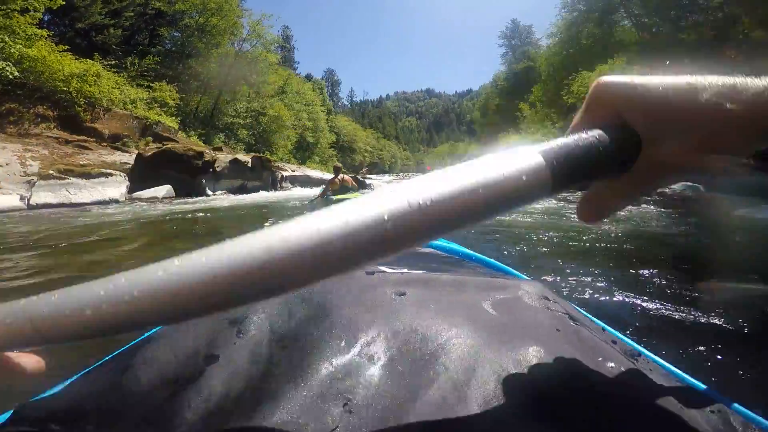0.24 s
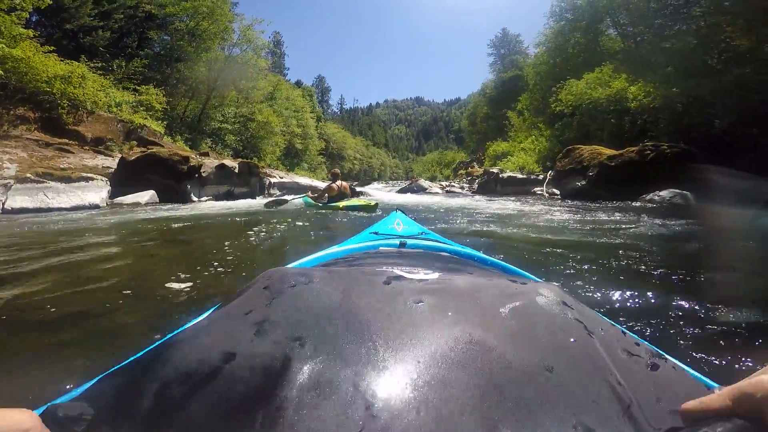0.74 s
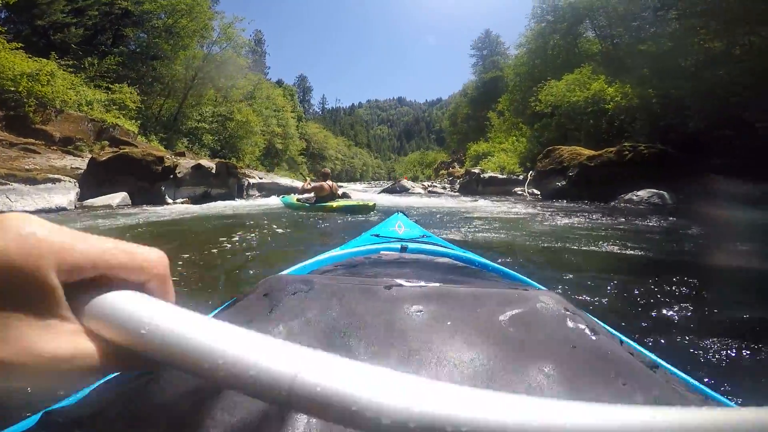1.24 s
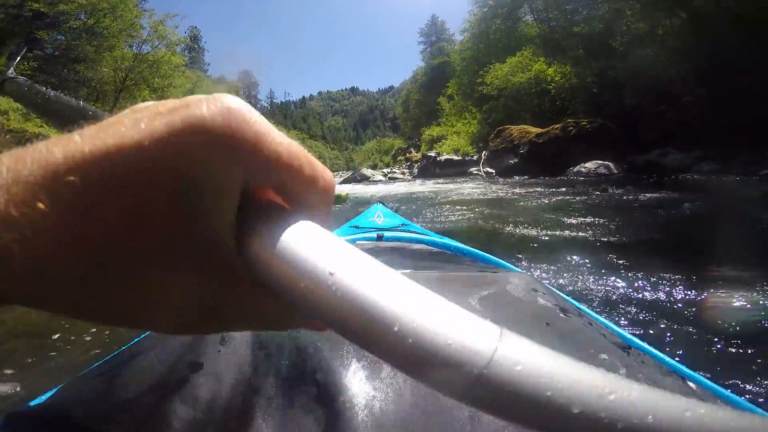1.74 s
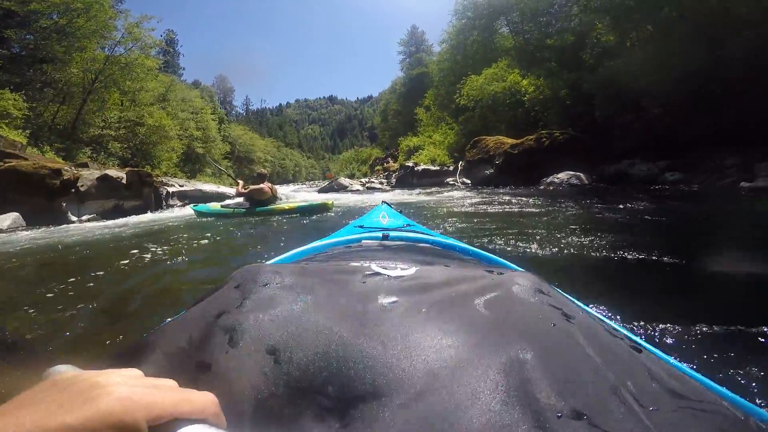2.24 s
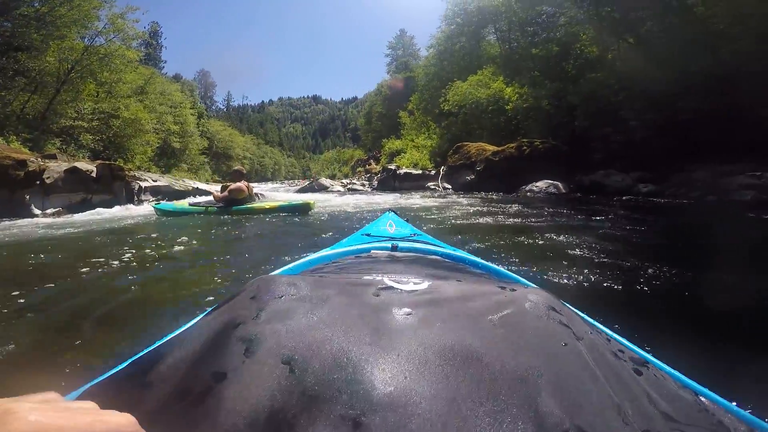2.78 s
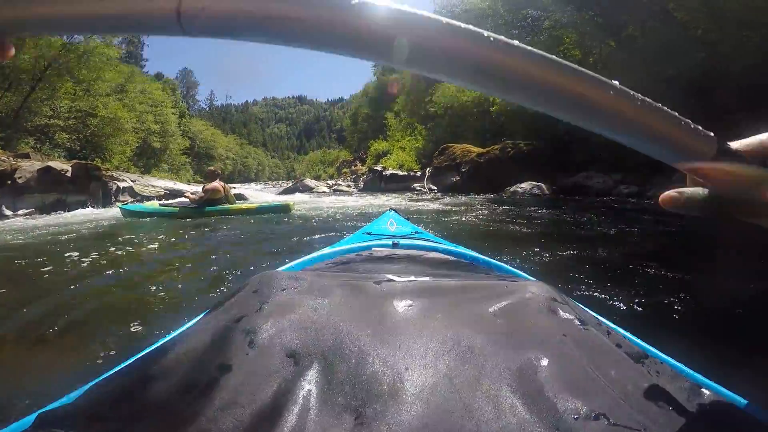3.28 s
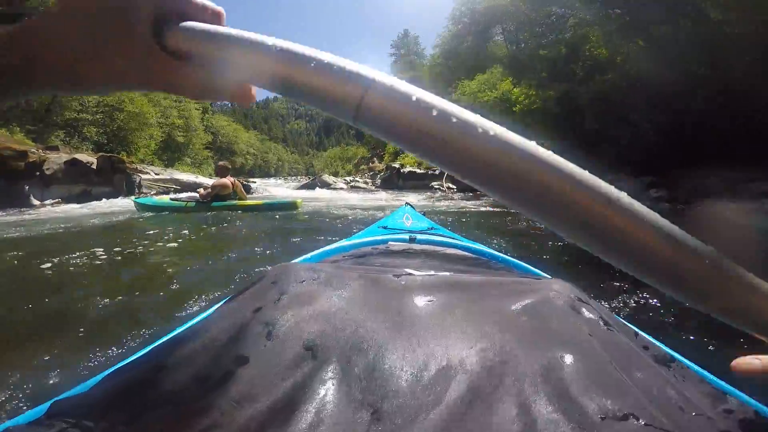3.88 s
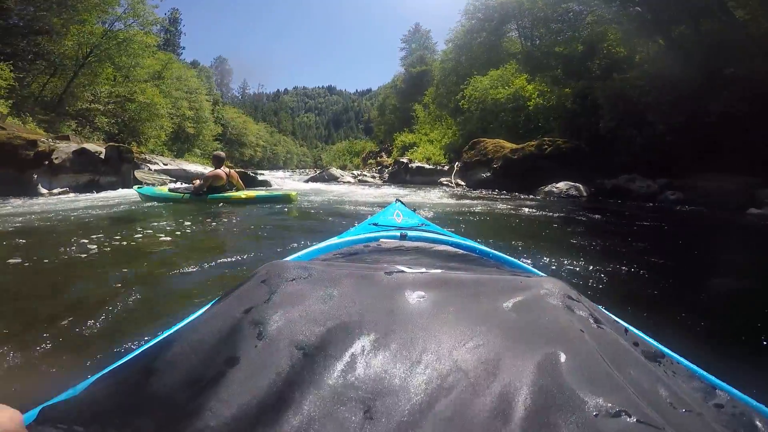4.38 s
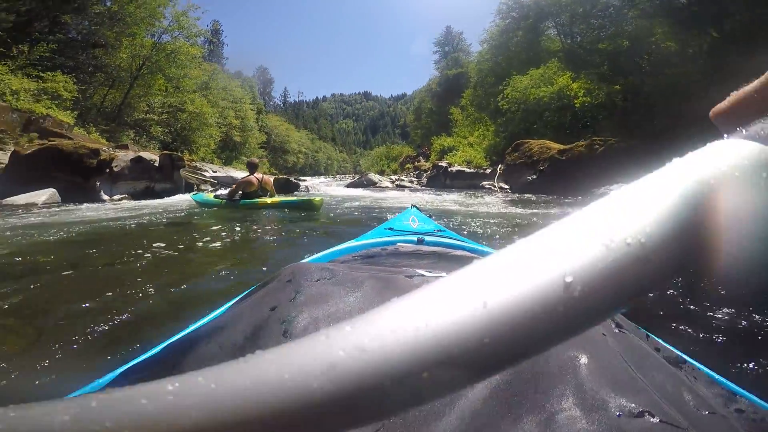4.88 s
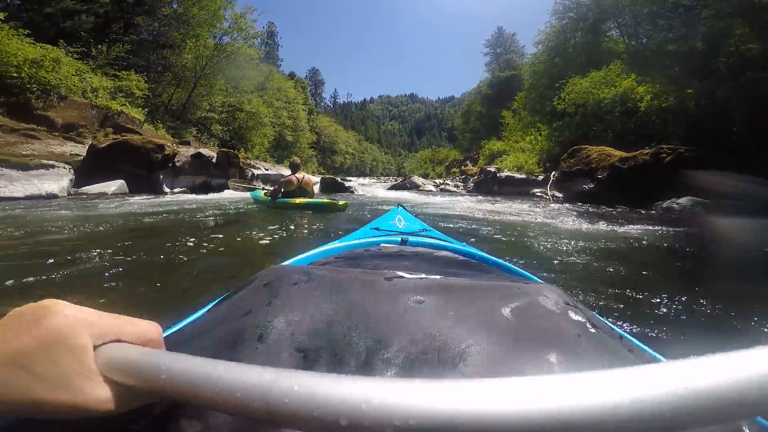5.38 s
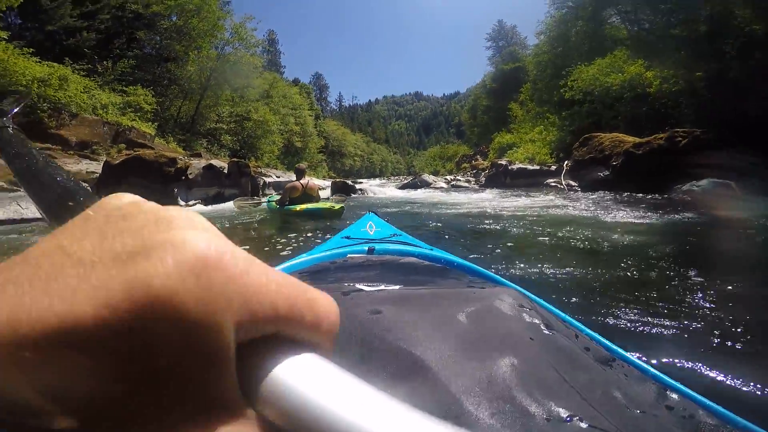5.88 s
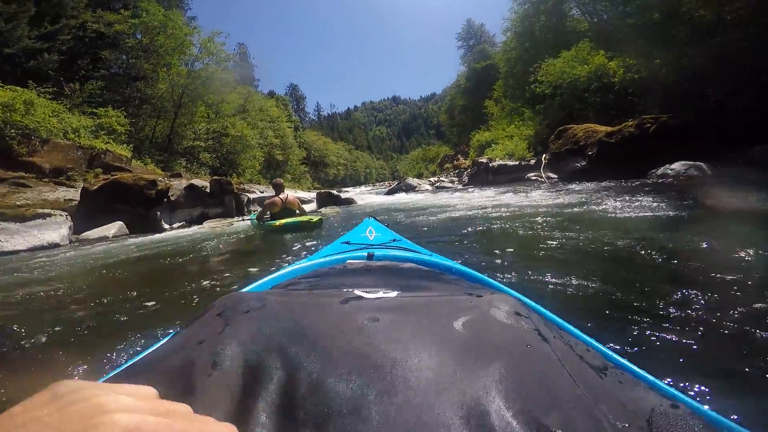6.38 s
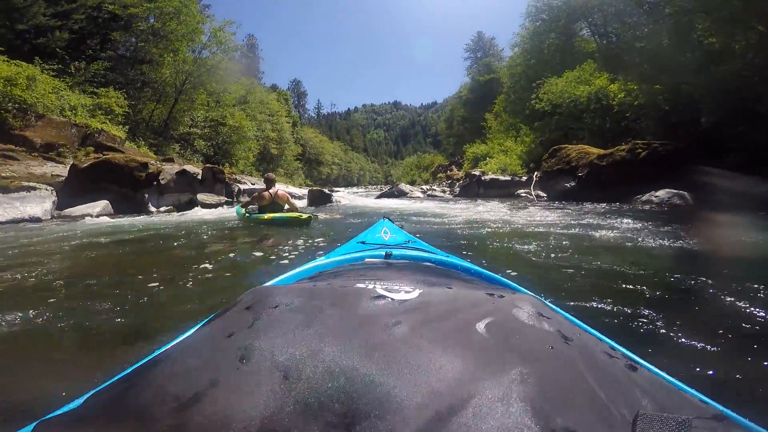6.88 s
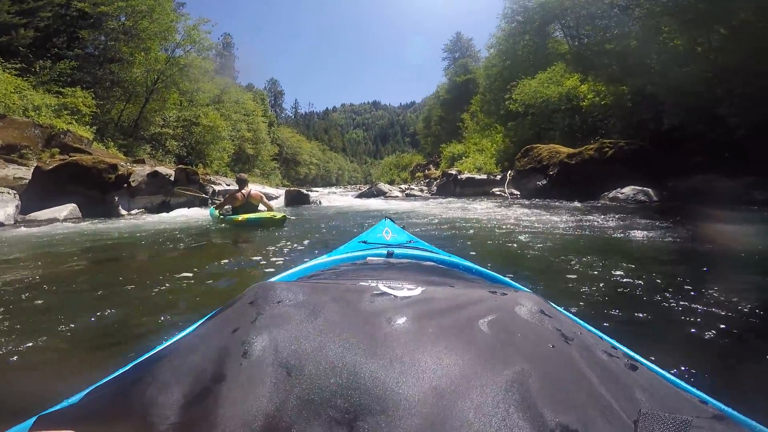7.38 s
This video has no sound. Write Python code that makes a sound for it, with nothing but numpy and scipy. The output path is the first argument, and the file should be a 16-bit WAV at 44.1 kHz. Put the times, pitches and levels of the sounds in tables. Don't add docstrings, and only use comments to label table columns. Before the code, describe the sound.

Steady muffled rush of river rapids heard from a kayak, with low wind rumble, bassy body thumps, small drips, hollow paddle plops and one hard knock.

```python
import sys
import numpy as np
from scipy import signal
from scipy.io import wavfile
from scipy.ndimage import uniform_filter1d

SR = 44100
rng = np.random.default_rng(int(sys.argv[2]) if len(sys.argv) > 2 else 0)


def rack_gain(trim_db):
    fader = np.asarray(trim_db, float)
    return 10 ** (fader / 20)


def waveform_to_disk(signal):
    frames = np.transpose(np.atleast_2d(signal))
    scaled = np.clip(frames, -1, 1) * 32767
    samples = np.round(scaled).astype(np.int16)
    wavfile.write(sys.argv[1], SR, samples)


N = 336483


def evened(x):
    return x / np.sqrt(np.mean(x ** 2) + 1e-20)


def read_spectrum(points, hz):
    f, value = np.transpose(points)
    return np.interp(np.log(hz + 1), np.log(f + 1), value)


def steady(points):
    return lambda hz, t: read_spectrum(points, hz) + 0 * t


def add(mix, s, sound):
    at = round(s * SR) - len(sound) // 2 + np.arange(len(sound))
    inside = (at >= 0) & (at < N)
    mix[at[inside]] += sound[inside]


def curves(rows, t):
    s, *columns = np.transpose(rows)
    return [np.interp(t, s, column) for column in columns]


def noise(field_db, size, patchy_db, flicker_db):
    hop = size // 4
    frames, hz = N // hop + 5, np.fft.rfftfreq(size, 1 / SR)
    real, imaginary, patches = rng.standard_normal((frames, len(hz), 3)).T
    patches = uniform_filter1d(patches, size=8, axis=0)
    patches = evened(uniform_filter1d(patches, size=8, axis=1))
    flicker = evened(uniform_filter1d(rng.standard_normal(frames), size=4))
    level = field_db(hz[:, None], np.arange(frames) * hop / SR)
    level = level + patchy_db * patches + flicker_db * flicker
    spectra = (real + 1j * imaginary) * rack_gain(level)
    return signal.istft(spectra, nperseg=size, noverlap=size - hop)[1][:N]


# (time [s], roar level [dB], wash level [dB], splash level [dB], spray level [dB])
WATER_SWELLS = [(0.0, -54, -55, -53.5, -59.5), (0.22, -56, -53, -55, -62), (0.44, -53, -53, -54, -60.5),
                (0.65, -57, -56, -55.5, -63), (0.87, -57, -59, -55, -63.1), (1.09, -57.5, -57.5, -57, -66),
                (1.31, -57.5, -60.5, -57.5, -66), (1.53, -58.6, -55.5, -58.1, -65.5),
                (1.74, -56.5, -58, -58.1, -64.6), (1.96, -56, -57, -56.5, -64.5),
                (2.18, -58, -58, -57, -64.5), (2.4, -57, -56.1, -57.5, -64.0),
                (2.62, -55.5, -57.5, -56.5, -64.5), (2.83, -54.5, -55.5, -56.5, -65),
                (3.05, -56, -55.5, -59, -64), (3.27, -56.5, -54.5, -59, -65.5),
                (3.49, -56.5, -56, -57.5, -65.5), (3.71, -58, -55.5, -57.5, -63),
                (3.92, -54.5, -56.2, -58, -64), (4.14, -55.5, -55.5, -54, -63),
                (4.36, -55, -56.5, -56, -62.3), (4.58, -59, -54.5, -55.5, -63.0),
                (4.8, -56.3, -56, -58, -64.5), (5.01, -55.7, -55.5, -55.5, -64),
                (5.23, -54, -52.5, -54.1, -61.5), (5.45, -57.5, -54, -55, -60.5),
                (5.67, -55, -57, -53.5, -62), (5.89, -54.5, -55.8, -52.5, -61.5),
                (6.1, -55, -58, -52.5, -60), (6.32, -55, -59, -55, -62), (6.54, -54.5, -57.5, -53, -60),
                (6.76, -55, -57, -55, -61.5), (6.98, -57.5, -56.5, -54.5, -61.4),
                (7.19, -56.5, -58, -55.5, -61.5), (7.41, -55, -56.5, -54.5, -63),
                (7.63, -55.5, -55.6, -55, -61)]
SWELL_HZ = [900, 1400, 2400, 4500]
# (frequency [Hz], level per Hz [dB])
ROAR_SPECTRUM = [(150, -12), (300, -0.5), (640, 0.5), (1000, -0.5), (1500, 1.5), (2300, -2), (2900, -5),
                 (3500, -12), (4600, -15), (5600, -22.5), (6700, -23.5), (8500, -30), (10500, -39),
                 (13000, -45)]
# (frequency [Hz], width [Hz], level [dB])
CASE_DIPS = [(575, 36, -13), (1162, 70, -17), (1753, 144, -7), (1970, 160, -7), (2510, 44, -8),
             (3220, 110, -11), (4000, 150, -7), (7700, 490, -10)]


def water_db(hz, t):
    case_db = sum(db / (1 + (2 * (hz - f) / width) ** 2) for f, width, db in CASE_DIPS)
    level = read_spectrum(ROAR_SPECTRUM, hz) - 56 + case_db
    level = level - 99 * (hz <= 100)
    for db, band in zip(curves(WATER_SWELLS, t), np.eye(4)):
        share = np.interp(np.log(hz + 1), np.log(SWELL_HZ), band)
        level = level + share * (db - db.mean())
    return level


def rapids():
    return rack_gain(-9.0) * noise(water_db, size=1024, patchy_db=0.8, flicker_db=0.2)


def fizz(per_s=900, spread_db=1.0, cycles=5.5):
    bubbles, pitch = np.zeros(N), rng.integers(0, 30, N)
    bursts = rng.random(N) < per_s / SR
    size = bursts * rack_gain(spread_db * np.minimum(rng.exponential(1, N), 5))
    for k, hz in enumerate(np.geomspace(600, 12000, 30)):
        u = np.arange(int(3 * cycles * SR / hz)) * hz / SR
        ring = np.sin(2 * np.pi * u * (1 + 0.0095 * u))
        ring = ring * np.exp(-2 * u / cycles) * (1 - np.exp(-2 * u))
        bubbles += signal.oaconvolve(size * (pitch == k), ring * hz / 1000)[:N]
    hz, t, z = signal.stft(evened(bubbles), SR, nperseg=512)
    spray_db = curves(WATER_SWELLS, t)[3]
    crowding_db = 0.72 * (spray_db - spray_db.mean())
    z = z * rack_gain(water_db(hz[:, None], t) + crowding_db)
    return rack_gain(8.0) * signal.istft(z, nperseg=512)[1][:N]


# (time [s], heave level [dB], flutter level [dB], rustle level [dB])
BUFFET_LEVELS = [(0.0, -29, -47.7, -54.5), (0.2, -36.5, -47.5, -53), (0.39, -34, -44.5, -50),
                 (0.59, -39, -46.7, -56), (0.78, -35, -43, -54.5), (0.98, -37, -46.5, -56.5),
                 (1.17, -29.5, -44.5, -59.5), (1.37, -36.5, -45.4, -56.5), (1.57, -38.9, -49, -55.5),
                 (1.76, -33, -50.5, -57.2), (1.96, -39.2, -43, -54.5), (2.15, -38, -46.5, -53),
                 (2.35, -37.8, -49.5, -58), (2.54, -40, -49, -55), (2.74, -36, -47.8, -57),
                 (2.93, -31, -50, -55), (3.13, -37, -46.2, -53.5), (3.33, -37, -49.1, -57.5),
                 (3.52, -37.5, -48, -55.5), (3.72, -39.5, -47, -52), (3.91, -37, -49.5, -56.5),
                 (4.11, -37, -47, -51.5), (4.3, -32, -41.5, -55), (4.5, -35, -42.5, -51.5),
                 (4.7, -33, -46.5, -57), (4.89, -37, -45, -53), (5.09, -35, -52, -57.5),
                 (5.28, -33, -48, -58), (5.48, -39.8, -46.5, -55.2), (5.67, -35, -42, -48.5),
                 (5.87, -34.5, -42.5, -51), (6.06, -40, -44.5, -55.3), (6.26, -31.5, -42, -50.5),
                 (6.46, -29, -40.5, -50.5), (6.65, -32, -46, -57.5), (6.85, -33, -42.5, -51.5),
                 (7.04, -34, -44, -53.5), (7.24, -37, -51.5, -58), (7.43, -42, -52, -56),
                 (7.63, -42, -49, -56)]
# (frequency [Hz], level per Hz [dB])
HEAVE_SPECTRUM = [(8, -44), (18, 9), (28, 19), (42, 11), (60, 7.5), (90, -40.5)]
# (frequency [Hz], level per Hz [dB])
FLUTTER_SPECTRUM = [(40, -30), (65, 9.5), (95, 6.5), (130, 8), (180, -4), (260, -43.5)]
# (frequency [Hz], level per Hz [dB])
RUSTLE_SPECTRUM = [(120, -12.5), (190, 6), (300, 2), (450, -7), (530, -18)]


def buffet():
    out = np.zeros(N)
    layers = (  # spectrum, lumps [dB], lift [dB]
        (HEAVE_SPECTRUM, 0.6, -3.0), (FLUTTER_SPECTRUM, 2.5, -0.7), (RUSTLE_SPECTRUM, 1.5, -1.5))
    levels = curves(BUFFET_LEVELS, np.arange(N) / SR)
    for db, (spectrum, lumps_db, lift_db) in zip(levels, layers):
        field = steady(spectrum + [(4000, -120)])
        layer = noise(field, size=2048, patchy_db=1.5, flicker_db=lumps_db)
        out += rack_gain(db + lift_db) * evened(layer)
    return out


# (multiple of the frame rate [1], level [dB])
WHINE_TONES = [(210, -82), (211, -84), (421, -73), (420, -91), (419, -93)]


def whine():
    period = 2943
    frame_hz = 2 * SR / period
    comb = [(k, -102 - 0.3 * abs(k - 421)) for k in range(405, 434) if abs(k - 420.5) > 2]
    t = np.arange(period) / SR
    loop = np.zeros(period)
    for k, db in WHINE_TONES + comb:
        loop += rack_gain(db + 3) * np.sin(2 * np.pi * (k * frame_hz * t + rng.random()))
    return np.resize(loop, N)


# (frequency [Hz], level per Hz [dB])
HISS_SPECTRUM = [(4000, 1), (9000, 2), (11000, -6), (13000, 6), (14000, -13), (15000, -20), (16000, 5)]


def hiss():
    return rack_gain(-63.5) * evened(noise(steady(HISS_SPECTRUM), size=1024, patchy_db=1.5, flicker_db=0.7))


# (time of the trough [s], peak level [dB], frequency [Hz], length [s],
# lag of the swell [s])
BODY_THUMPS = [(0.037, -26, 29.4, 0.026, -0.006), (0.114, -18.5, 32.0, 0.042, 0.018),
               (0.201, -32, 27.6, 0.034, 0.024), (0.293, -32, 27.6, 0.032, -0.013),
               (0.405, -27, 33.2, 0.023, -0.012), (0.65, -22.5, 30.8, 0.022, 0.013),
               (0.741, -31, 35, 0.019, -0.014), (0.825, -33.5, 42, 0.048, 0.00038),
               (0.922, -32.5, 35.3, 0.033, -0.0076), (1.114, -28.5, 27.4, 0.031, 0.003),
               (1.261, -21, 33.5, 0.064, -0.019), (1.639, -32.5, 33, 0.049, 0.0093),
               (1.767, -20.5, 30.6, 0.049, -0.006), (2.141, -28, 38.2, 0.021, -0.0093),
               (2.304, -21.0, 27.6, 0.053, 0.00061), (2.824, -17.5, 30.9, 0.044, 0.021),
               (2.974, -31, 28.7, 0.045, 0.0094), (3.417, -23, 27.3, 0.047, -0.012),
               (3.997, -20.5, 30, 0.05, -0.0074), (4.213, -28, 41, 0.027, -0.017),
               (4.347, -29, 39.6, 0.026, -0.015), (4.43, -14.5, 35.9, 0.024, -0.01),
               (4.577, -21.5, 27.7, 0.047, -0.0051), (4.916, -27.5, 28.2, 0.018, -0.0094),
               (5.07, -32.5, 21.9, 0.072, 0.014), (5.162, -23, 29.4, 0.021, -0.001),
               (5.729, -19.5, 31.4, 0.028, 0.01), (5.818, -22, 31, 0.025, -0.016),
               (5.928, -25, 36, 0.02, 0.0058), (6.234, -33, 39, 0.027, 0.015),
               (6.383, -19, 37.3, 0.075, -0.014), (6.551, -25, 32, 0.017, -0.0067),
               (6.669, -24.5, 36.7, 0.019, 0.011), (6.766, -27, 28.0, 0.018, 0.001),
               (6.838, -31, 34, 0.046, -0.003), (6.933, -16.5, 28, 0.04, -0.0041),
               (7.109, -26, 37, 0.025, 0.015), (7.519, -22.5, 28, 0.058, -0.0037)]


def thumps(overtone=0.18, ring=0.22, ring_s=0.06):
    out, t = np.zeros(N), np.arange(-12000, 12000) / SR
    for s, db, hz, length, lag in BODY_THUMPS:
        bell = np.exp(-1.4 * ((t - lag) / length) ** 2)
        ringing = ring * np.exp(-abs(t - lag) / ring_s) * np.where(t > lag, 1, 0.4)
        swing = np.maximum(bell, ringing) * np.cos(2 * np.pi * hz * t)
        edge = overtone * bell * np.sin(2 * np.pi * 1.92 * hz * t)
        add(out, s, -rack_gain(db + 0.5) * (swing + edge))
    return out


# (time [s], peak level [dB], frequency [Hz], width [Hz])
BLADE_PLOPS = [
    (.089, -37, 380, 90.5),
    (.165, -40, 336, 50.5),
    (.497, -43, 310, 70),
    (4.057, -40, 334, 50),
    (4.168, -39, 630, 250),
    (6.432, -42, 764, 90),
    (6.462, -43, 750, 120),
    (6.475, -41, 644, 250),
    (6.52, -46, 710, 200),
    (6.67, -50, 730, 80),
]
# (time [s], peak level [dB], frequency [Hz], width [Hz])
WATER_DROPS = [(0.123, -55, 7063, 860), (0.181, -59, 6891, 688), (0.339, -54, 4307, 344),
               (0.35, -44.5, 2040, 172), (0.447, -61, 8269, 860), (0.512, -41, 880, 520),
               (0.598, -51, 2820, 344), (0.678, -43, 1640, 516), (0.726, -55, 7063, 1548),
               (0.768, -54, 3770, 516), (0.768, -64, 6891, 344), (0.776, -60, 5340, 344),
               (0.916, -58, 4651, 516), (0.985, -51, 1400, 344), (1.428, -69, 9302, 688),
               (3.744, -57, 6700, 1204), (3.971, -47, 2390, 344), (4.094, -43, 2630, 688),
               (4.15, -62, 4440, 344), (4.403, -38, 2600, 516), (4.461, -57, 4996, 516),
               (4.648, -55, 4651, 860), (4.65, -46.5, 2260, 344), (4.776, -55.5, 4996, 688),
               (5.008, -46, 1420, 346), (5.106, -56, 6760, 1376), (5.123, -60, 6718, 516),
               (5.214, -57, 3930, 344), (5.238, -41.5, 1390, 344), (5.254, -61, 9130, 516),
               (5.277, -53, 6718, 2064), (5.407, -61, 4750, 688), (5.566, -67, 6718, 344),
               (5.569, -52, 3580, 516), (5.682, -65, 8096, 516), (5.752, -52, 4160, 860),
               (5.813, -69, 7752, 344), (5.814, -59, 4307, 344), (5.991, -63, 8096, 1376),
               (5.996, -57, 5070, 516), (6.026, -47, 4550, 1376), (6.042, -61, 7580, 516),
               (6.116, -66, 8441, 510), (6.198, -58, 6670, 1032), (6.446, -43.5, 840, 344),
               (6.446, -52, 4134, 1032), (6.475, -41, 1206, 688), (6.496, -55, 4479, 860),
               (6.555, -59, 6100, 516), (6.664, -63, 7063, 516), (6.842, -54, 4260, 344),
               (6.873, -53, 4134, 516), (6.938, -65, 7752, 516), (6.943, -61, 9130, 1032),
               (7.174, -46.5, 1520, 344), (7.198, -68, 7580, 344), (7.458, -54, 4307, 860)]


def drops():
    out, t = np.zeros(N), np.arange(-1500, 1500) / SR
    for rows, gain_db in ((BLADE_PLOPS, 0.5), (WATER_DROPS, 5.0)):
        for s, db, hz, width in rows:
            u = np.maximum(t * width * 2.84 + 1, 0)
            ring = np.sin(2 * np.pi * hz * t * (1 + 0.0013 * u))
            add(out, s, rack_gain(db + gain_db) * u * np.exp(1 - u) * ring)
    return out


# (time [s], peak level [dB], frequency [Hz], direction [sign])
CASE_KNOCKS = [(0.113, -32, 104, -1), (0.16, -29.5, 123, 1), (0.497, -32, 120, -1), (1.374, -32.5, 108, -1),
               (2.053, -32, 101, 1), (2.271, -32, 89, 1), (2.843, -38, 91, -1), (3.01, -36, 78, 1),
               (3.076, -36.0, 105, -1), (3.398, -31, 87, -1), (3.998, -36.4, 108, 1), (4.139, -32, 104, 1),
               (4.174, -24.5, 169, 1), (4.396, -13, 103.5, 1), (4.817, -31.5, 112, -1),
               (5.415, -29.5, 106, -1), (5.664, -29.5, 103, 1), (5.986, -30.5, 90, -1),
               (6.234, -29.0, 96, -1), (6.528, -29, 131, 1), (6.686, -24.5, 114, 1), (6.87, -24, 188, -1),
               (6.91, -27, 84, -1)]


def knocks():
    out, t = np.zeros(N), np.arange(-3000, 3000) / SR
    for s, db, hz, direction in CASE_KNOCKS:
        u = t * hz
        swell = np.exp(-(u / np.where(u < 0, 0.45, 1.1)) ** 2)
        swing = np.cos(2 * np.pi * u * (1 - 0.11 * u))
        add(out, s, np.sign(direction) * rack_gain(db - 1.0) * swell * swing)
    return out


# (time [s], peak level [dB], low edge [Hz], high edge [Hz], tail [s])
SPRAY_TICKS = [(.2223, -48, 6000, 12000, .0015), (3.637, -50, 3000, 14000, .001),
               (3.6406, -48, 7340, 10600, .0015), (4.13, -38, 2300, 4500, .002),
               (5.0372, -43, 6000, 9700, .0012), (5.0737, -62, 8500, 12000, .001),
               (5.33, -45.5, 5000, 10000, 0.0038), (5.4732, -47, 7040, 15000, .0007),
               (5.485, -42, 3300, 7900, 0.0026), (5.6506, -58, 7000, 11000, .001),
               (6.8788, -51, 7000, 11000, .001), (7.082, -48.5, 7400, 12000, .001)]


def ticks():
    out, t = np.zeros(N), np.arange(-600, 600) / SR
    for s, db, low_hz, high_hz, tail in SPRAY_TICKS:
        crackle = rng.standard_normal(1200) * (t > 0) * np.exp(-abs(t) / tail)
        click = (t == 0) + 0.51 * crackle
        band = signal.butter(3, [low_hz, high_hz], "band", fs=SR, output="sos")
        click = signal.sosfilt(band, click)
        add(out, s, rack_gain(db) * click / abs(click).max())
    return out


def scene():
    water = rapids() + fizz() + drops() + ticks()
    case = buffet() + thumps() + knocks()
    return (water + case + whine() + hiss())[None]


def low_pass(x):
    return signal.sosfilt(signal.butter(12, 15190, fs=SR, output="sos"), x)


def record(dry):
    hz, t, z = signal.stft(dry, SR, nperseg=1024)
    bass_db = 10 * np.log10((abs(z[:, :4]) ** 2).sum(1, keepdims=True) + 1e-12)
    edge_hz = 15398 - 250 * np.maximum(bass_db + 20, 0) * rng.uniform(0.2, 1, bass_db.shape)
    kept = np.clip((edge_hz - hz[:, None]) / 150, 0, 1)
    kept = np.maximum(kept, hz[:, None] < 12800)
    mix = signal.istft(z * kept, nperseg=1024)[1][:, :N]
    return low_pass(mix)


dry = scene()
out = record(dry)
waveform_to_disk(out)
```